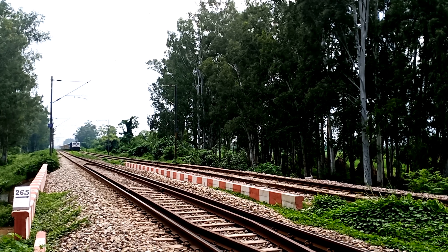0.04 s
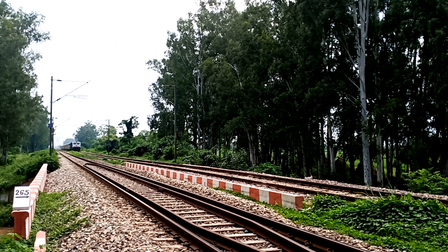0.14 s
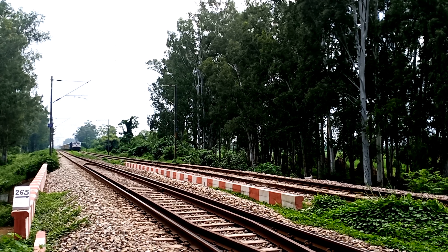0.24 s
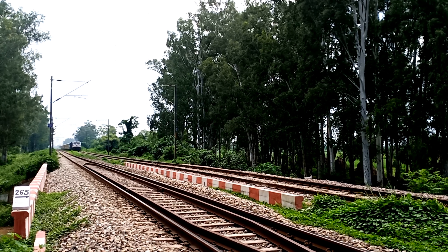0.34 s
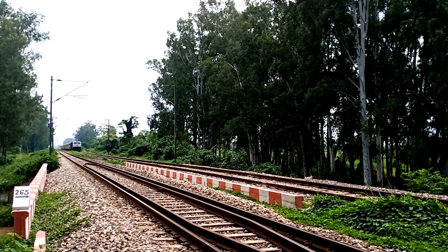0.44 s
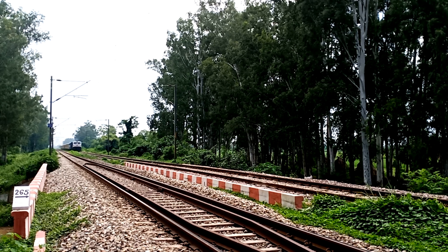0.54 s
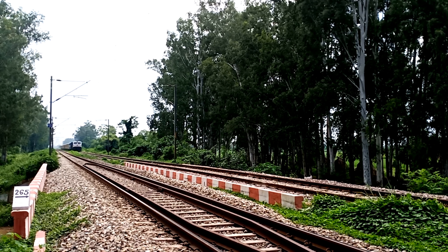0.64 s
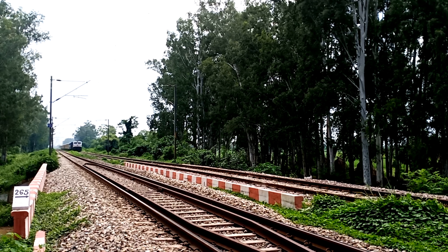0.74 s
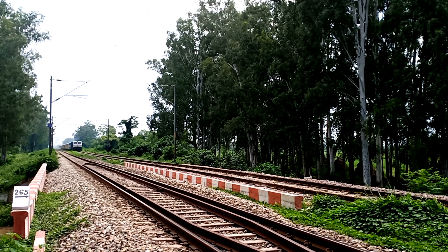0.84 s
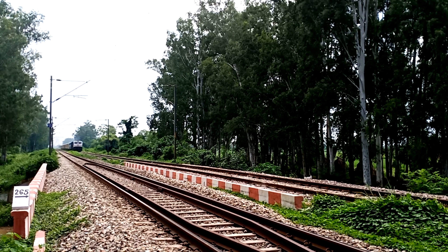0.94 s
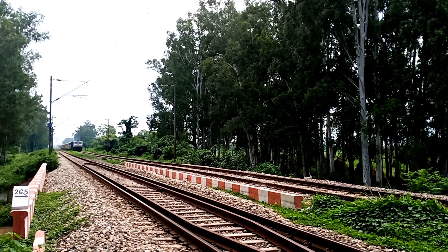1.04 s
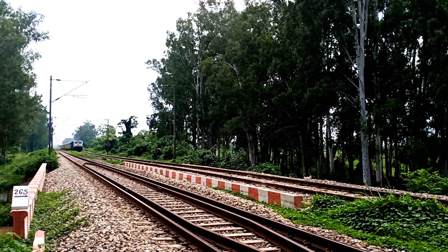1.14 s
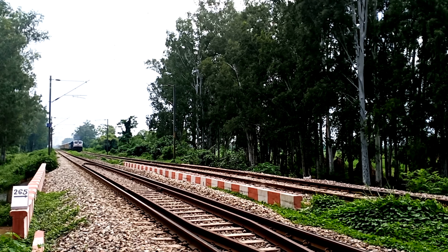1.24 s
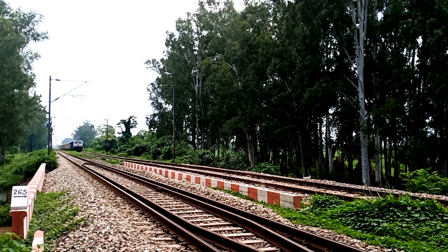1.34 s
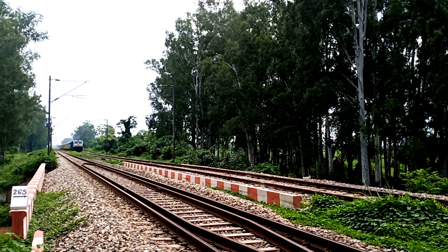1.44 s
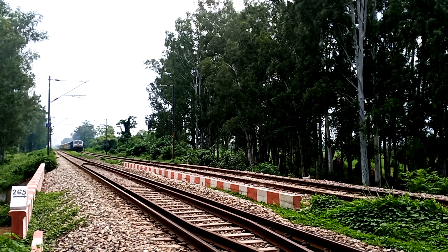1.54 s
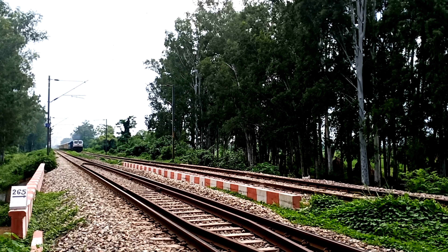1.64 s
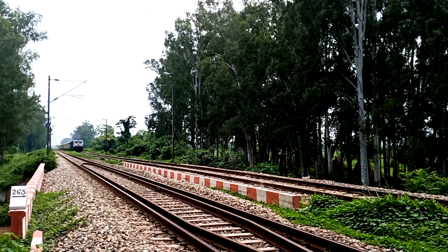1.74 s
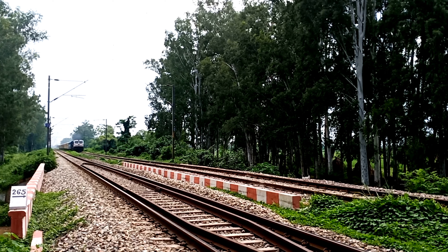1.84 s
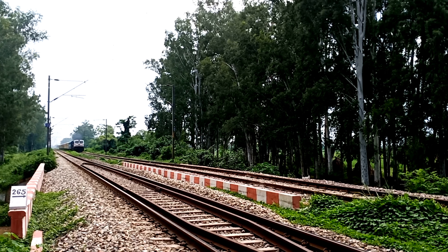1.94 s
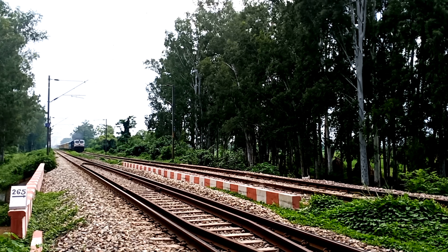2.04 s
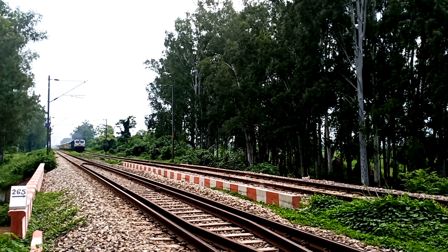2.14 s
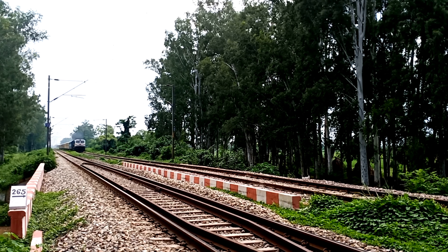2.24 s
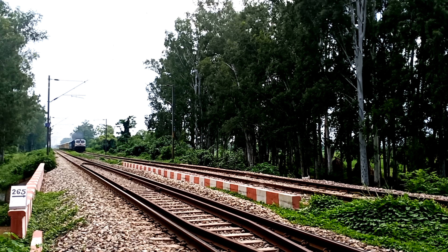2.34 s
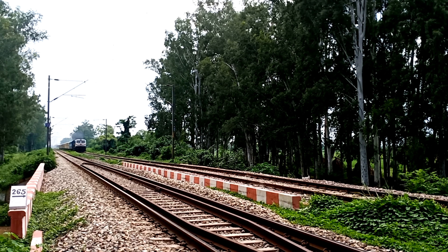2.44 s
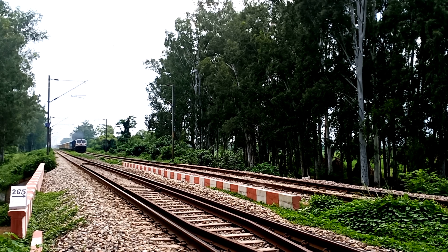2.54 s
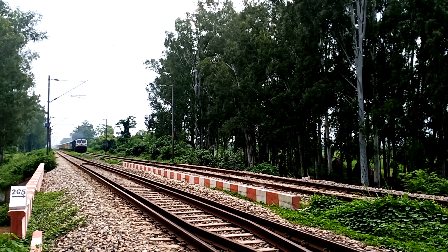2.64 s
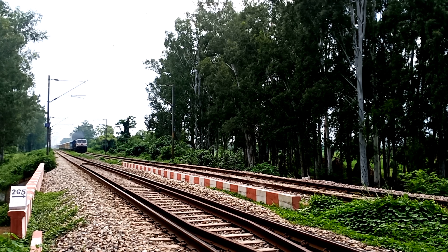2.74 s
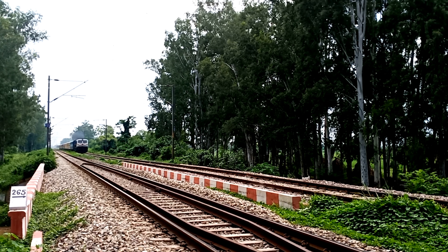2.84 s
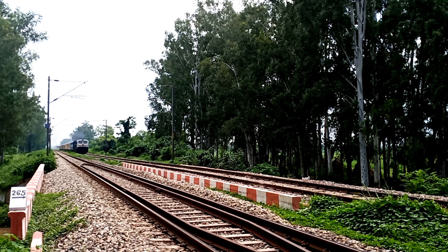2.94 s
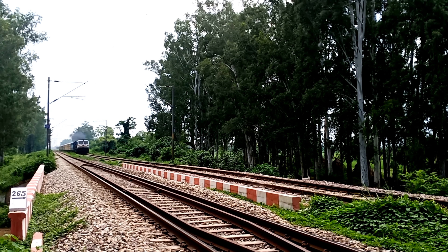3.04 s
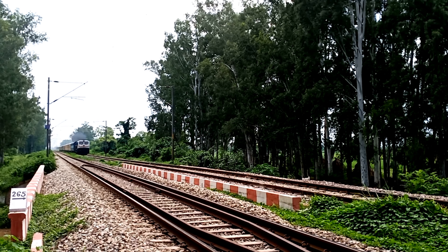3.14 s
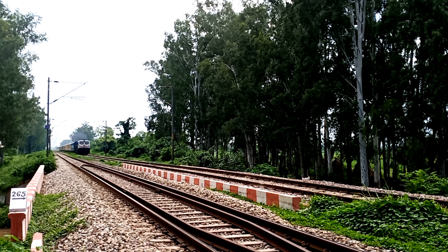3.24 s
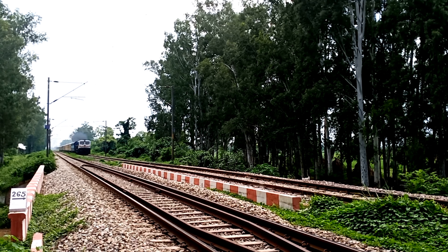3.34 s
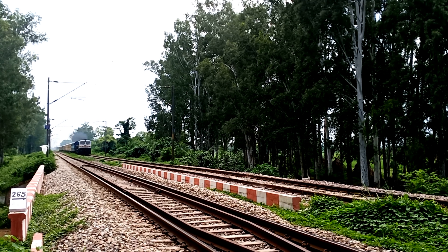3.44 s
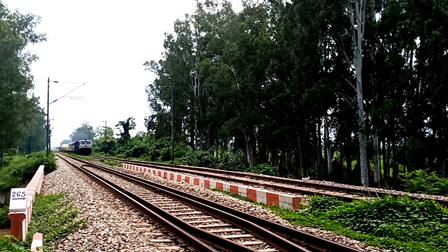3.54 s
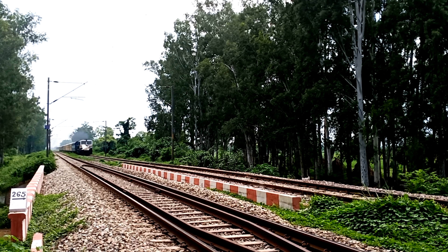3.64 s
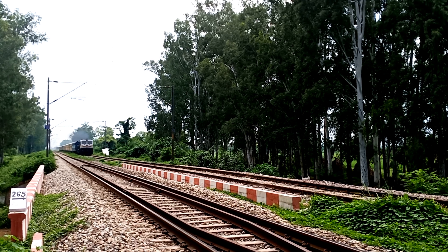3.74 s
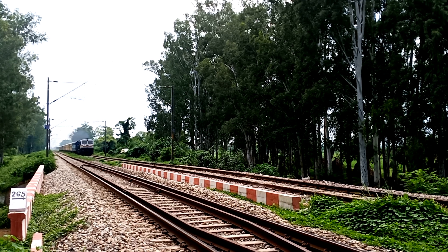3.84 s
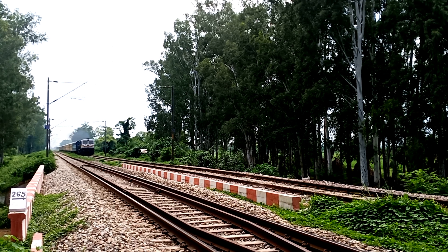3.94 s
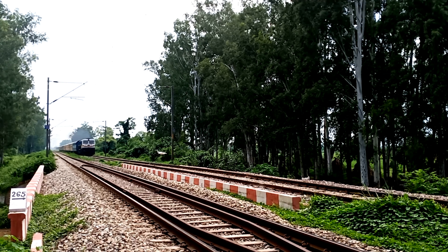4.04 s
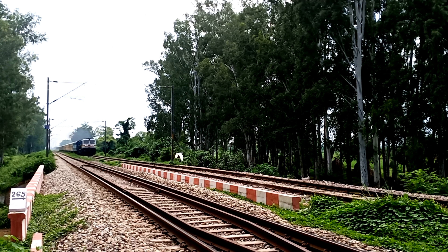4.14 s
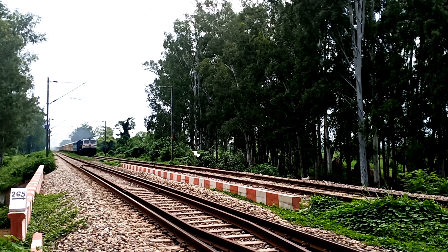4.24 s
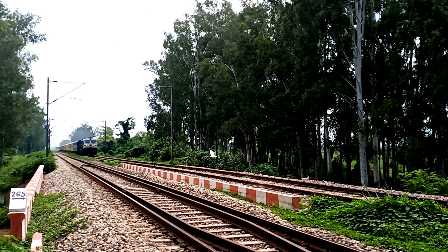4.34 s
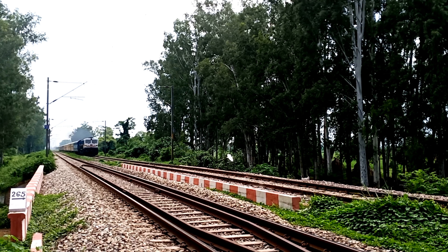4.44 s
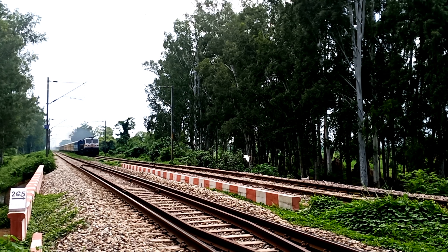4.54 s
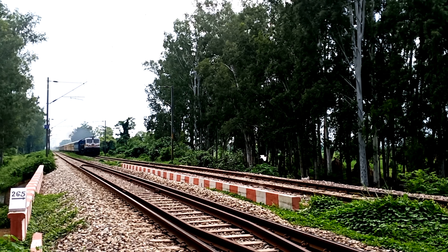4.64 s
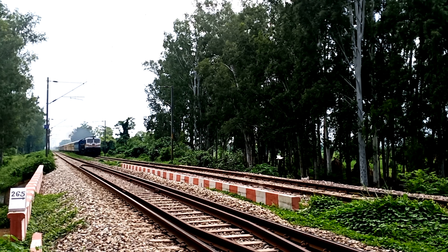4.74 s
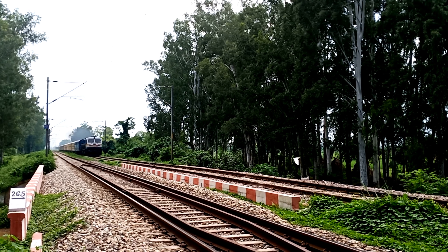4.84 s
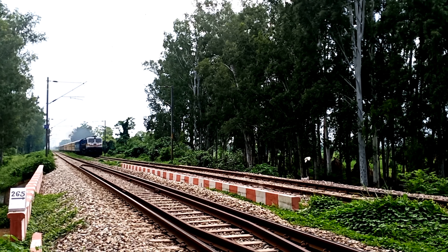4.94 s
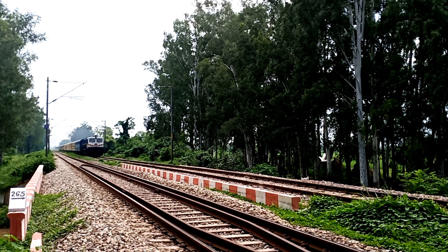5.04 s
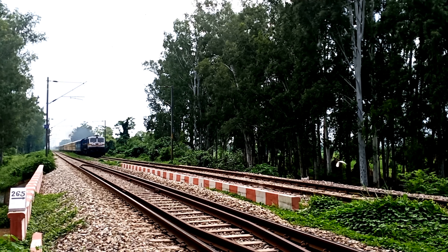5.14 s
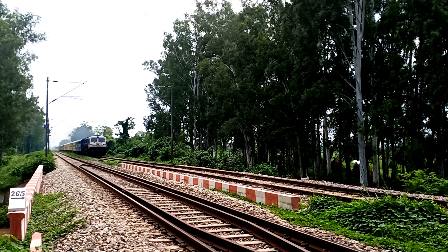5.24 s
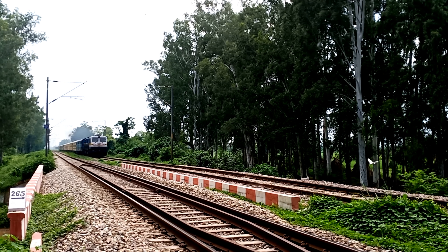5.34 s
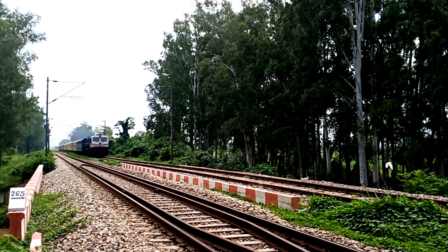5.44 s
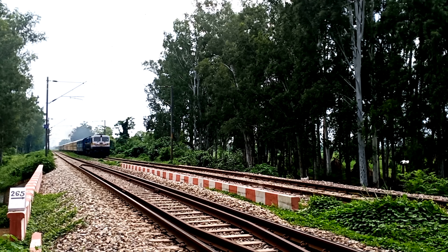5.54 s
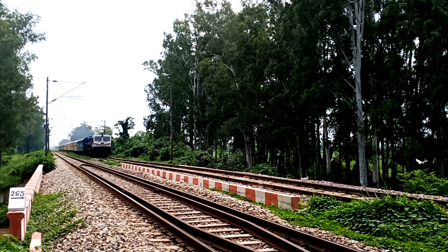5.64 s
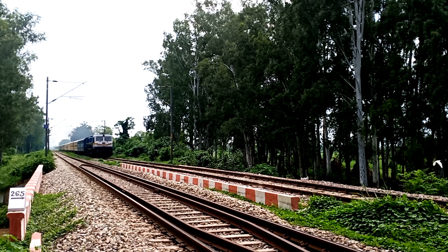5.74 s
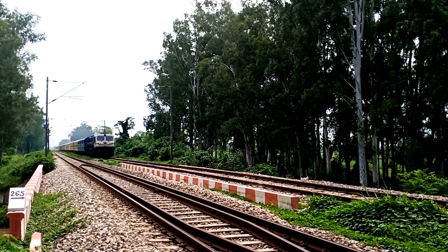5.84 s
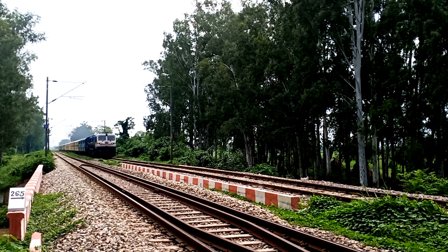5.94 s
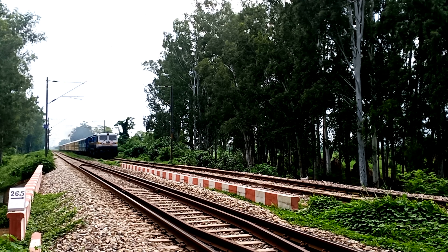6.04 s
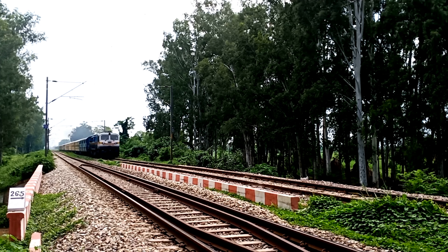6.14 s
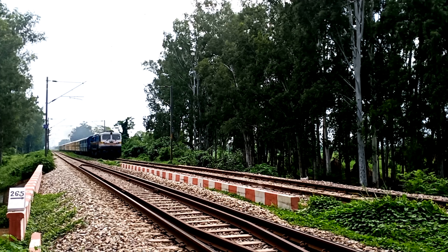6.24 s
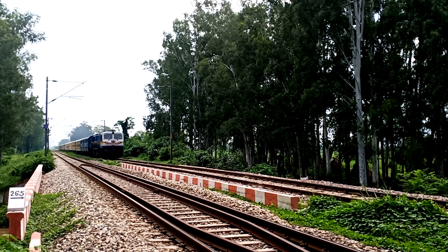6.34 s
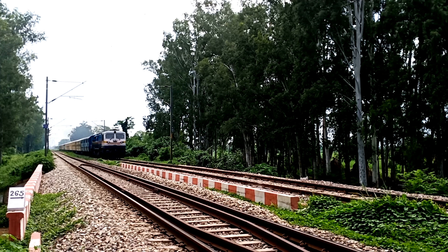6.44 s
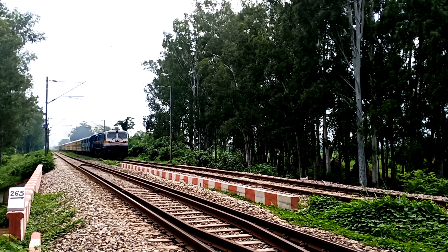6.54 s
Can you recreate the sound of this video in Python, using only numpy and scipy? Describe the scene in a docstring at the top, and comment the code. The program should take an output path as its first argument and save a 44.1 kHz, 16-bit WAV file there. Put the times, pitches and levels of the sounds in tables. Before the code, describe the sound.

A diesel train approaches through trees: faint toots over insect buzz, a high wavering metallic squeal, then growing throbbing exhaust, howl and rolling hiss.

```python
"""A track between tall trees, heard by two small microphones beside the line, as a diesel train comes up it.
Insects shrill in narrow noise bands, and thin far-off toots, glided sines, linger in scatter from the trunks.
The exhaust throbs once per crank turn, as harmonics of the crank speed beat over a noisy rumble and growl.
The roar of the wheels, shaped noise, swells and brightens; gears and rails ring in resonant bands and whines.
For a while flanges squeal: wavering harmonic tones, one set per wheel, that beat and flutter."""
import sys
import numpy as np
from scipy import signal
from scipy.fft import rfft, irfft
from scipy.io import wavfile
from scipy.ndimage import uniform_filter1d

SR = 44100
rng = np.random.default_rng(int(sys.argv[2]) if len(sys.argv) > 2 else 0)


def digitize_waveform(pressure):
    """Quantize a signal to 16-bit integers and store it at the path in sys.argv[1].

    Rows of a 2-D input are taken as channels; values are limited to [-1, 1].
    """
    field = np.atleast_2d(pressure).T
    bounded = np.clip(field, -1, 1)
    quanta = np.round(bounded * 32767).astype(np.int16)
    wavfile.write(sys.argv[1], SR, quanta)


N = 291060

FRAME, HOP = 2048, 512  # short-time spectra [samples]
TIME = np.arange(N) / SR
FRAME_TIME = np.arange(N // HOP + 5) * HOP / SR
BIN_HZ = np.fft.rfftfreq(FRAME, 1 / SR)

# approach of the rolling wheels, which also sets the rumble and the colours: (time [s], level [dB])
ROLLING_LEVEL = [(0.06, -67.5), (2.32, -53), (2.45, -48), (3.93, -41.5), (6.55, -34)]
# hoarse growl of the exhaust, 285-480 Hz: (time [s], level [dB])
GROWL_LEVEL = [(0.06, -70), (1.75, -70), (2.67, -63), (2.76, -44.5), (3.24, -56), (3.27, -44.5),
               (6.4, -36.5)]
# howl of gears and rails, 700-1050 Hz, before the trim of each layer: (time [s], level [dB])
HOWL_LEVEL = [(0.06, -57.5), (0.38, -48.5), (1.04, -58), (1.07, -52.5), (2.08, -52), (2.57, -40),
              (6.31, -29), (6.55, -32.5)]
CLOSE_DB = -36.5  # level of the wheels close by


def gain_of(db):
    """Amplitude ratio from decibels, twenty to a factor of ten."""
    return 10 ** (np.asarray(db) / 20)


def evened(x):
    """Normalization to unit root mean square."""
    return x / np.sqrt(np.mean(x ** 2) + 1e-20)


def at(rows, t):
    """Linear interpolation in time: the columns of a curve at the times t."""
    s, *columns = np.transpose(rows)
    return np.array([np.interp(t, s, c) for c in columns])


def shape(rows):
    """Spectral interpolation on a log-frequency axis: the columns at every bin."""
    hz, *columns = np.transpose(rows)
    return np.array([np.interp(np.log(BIN_HZ + 1), np.log(hz), c) for c in columns])


def level(rows):
    """Sampled envelope: a level curve [dB], one row per frame."""
    return at(rows, FRAME_TIME).T


def peak(hz, width):
    """Resonance: an amplitude response with steep skirts."""
    return 1 / (1 + 2 * ((BIN_HZ - hz) / width) ** 2)


def wander(rate):
    """Low-pass random process of rms 1: chance that changes up to about rate [Hz]."""
    t = TIME[::64]
    hz = np.fft.rfftfreq(len(t), t[1])
    spectrum = rfft(rng.standard_normal(len(t))) / (1 + (hz / rate) ** 4)
    return np.interp(TIME, t, evened(irfft(spectrum, len(t))))


def patches(size):
    """Random field of rms 1 over time and frequency, correlated over size = (frames, bins)."""
    field = rng.standard_normal((len(FRAME_TIME), len(BIN_HZ)))
    smooth_in_time = uniform_filter1d(field, size[0], axis=0)
    return evened(uniform_filter1d(smooth_in_time, size[1], axis=1))


def noise(density):
    """Partial coherence: noise of given amplitude per root Hz, shared in part by the two microphones."""
    # microphone pair: (frequency [Hz], coherence, phase by which left leads [rad])
    microphone_pair = [(170, .99, 0), (380, .92, -.3), (560, .72, -.5), (800, .76, -.4), (980, .45, 0),
                       (1100, .1, -1.5), (1420, .55, -2.6), (1900, .35, -2.4), (2250, .5, -.1),
                       (2700, .2, 1.5), (4000, .12, 2.6), (7000, .03, 0)]
    a, b, c, d = rng.standard_normal((4, len(FRAME_TIME), len(BIN_HZ)))
    coherence, lead = shape(microphone_pair)
    coherence = np.clip(coherence, -1, 1)
    left, unshared = a + 1j * b, c + 1j * d
    right = (coherence * left + np.sqrt(1 - coherence ** 2) * unshared) * np.exp(-1j * lead)
    spectra = np.array([left, right]) * density * np.sqrt(1.5 * SR / FRAME)  # 1.5 allows for window overlap
    _, pair = signal.istft(spectra.swapaxes(-1, -2), nperseg=FRAME, noverlap=FRAME - HOP)
    return pair[:, :N]


def trees(x, t60, wet_db):
    """Multiple scattering: direct sound plus sparse decaying echoes from trunks, unlike at each microphone."""
    t = TIME[:SR]
    sparse = rng.standard_normal((2, SR)) * (rng.random((2, SR)) < .05)
    tail = sparse * gain_of(-60 * t / t60)
    tail *= gain_of(wet_db) / np.linalg.norm(tail, axis=1, keepdims=True)
    scattered = signal.fftconvolve(x[None], tail, axes=1)[:, :N]
    return (x + scattered) / np.hypot(1, gain_of(wet_db))


def fading_tone(turns, rough, rate):
    """Multipath fading: a tone of rms 1 shaken in strength and phase by turbulent air and ground paths."""
    fading = (1 + rough * (wander(rate) + 1j * wander(rate))) / np.sqrt(1 + 2 * rough ** 2)
    return np.sqrt(2) * (fading * np.exp(2j * np.pi * turns)).real


def nearness():
    """Loudness as distance cue: 0 while the train is far, 1 when its wheels reach the close level."""
    approach_db = 22  # how much fainter the wheels are from afar
    return np.clip(1 + (level(ROLLING_LEVEL) - CLOSE_DB) / approach_db, 0, 1.1)


def rumble_curve():
    """Low-frequency propagation: rumble carries far, so its level grows more slowly than the wheel hiss."""
    close_rumble_db, slope, lowest_db = -34, 0.69, -50  # slope: dB gained per dB of the wheels
    return [(s, max(close_rumble_db + slope * (db - CLOSE_DB), lowest_db)) for s, db in ROLLING_LEVEL]


def insects(edge_s=0.027):
    """Narrow-band stridulation: shrill noise bands, some steady and some in short bursts."""
    # (start [s], end [s], centre [Hz], width [Hz], left density [dB per Hz], right density [dB per Hz])
    insect_bands = [(0, 5.9, 4640, 890, -84, -101), (0, 6.6, 5340, 260, -79.5, -86),
                    (0, 6.6, 9370, 686, -106, -94), (0, 0.39, 3730, 130, -78, -93),
                    (.2, 0.42, 7020, 330, -85, -89), (1.18, 1.66, 7060, 330, -91, -93),
                    (1.42, 1.93, 11330, 415, -106, -93.5), (1.739, 2.2, 7120, 326, -88, -89.5)]
    power = 0
    for start, end, hz, width, left_db, right_db in insect_bands:
        inside = np.minimum(FRAME_TIME - start, end - FRAME_TIME)
        gate = np.clip(inside / edge_s + .5, 0, 1)[:, None]
        band = np.exp(-2 * ((BIN_HZ - hz) / width) ** 2)
        power = power + (gain_of([[[left_db]], [[right_db]]]) * gate * band) ** 2
    return noise(np.sqrt(power))


def exhaust(throb_trim_db=-3.5, rough=.2, side_rough=0.5, first_throb_turns=.52, pipe_lag_turns=0.11):
    """Harmonic beating: eight firings a turn boom; lines from uneven cylinders beat with it once a turn."""
    # crankshaft: (time [s], speed [turns per s])
    crank = [(0.0, 16.85), (0.8, 16.83), (2.1, 16.55), (2.7, 16.54), (3.6, 16.93), (4.3, 17.13),
             (5.4, 16.79), (6.6, 16.83)]
    # (time [s], boom level at the firing rate [dB], level of the uneven throb before its trim [dB])
    exhaust_levels = [(0.06, -59, -56), (0.11, -52, -51.5), (0.49, -64, -44.5), (0.84, -50.5, -63),
                      (1.16, -37.5, -46), (1.69, -43.5, -45), (2.01, -73.5, -71), (2.41, -29.5, -37.5),
                      (2.84, -44, -45.5), (3.17, -37.5, -41), (3.33, -31, -34.5), (4.14, -25, -30.5),
                      (4.58, -46, -36), (4.85, -26.5, -30.5), (5.54, -25, -28), (5.75, -29, -40),
                      (6.04, -27, -29.5), (6.13, -34, -27.5), (6.3, -20, -27), (6.55, -24.5, -29)]
    # lines beating with the boom: (multiple of crank speed, level against the throb [dB])
    throb_lines = [(7, -12.5), (9, 1.5), (10, -1.5), (11, -16.5)]
    # drone just above the boom: (time [s], level [dB])
    drone_level = [(0.08, -68.5), (3.27, -56), (3.66, -38), (4.75, -63.5), (5.09, -36.5), (5.36, -48),
                   (5.57, -36), (5.77, -43.5), (6.55, -33)]
    # lines of three layers: (multiple of crank speed, level against the layer's curve [dB])
    rumble_lines = [(2, -44), (3, -27), (4, -9.5), (5, -11), (6, -14.5)]
    drone_lines = [(12, -11), (13, -3), (14, -14.5), (15, -9.5), (16, -9.5)]
    growl_lines = [(18, -6.5), (20, -24), (22, -12.5), (24, -13.5), (25, -11)]
    firing_order = 8  # firings per turn
    turns = np.cumsum(at(crank, TIME)[0]) / SR - first_throb_turns
    boom_db, throb_db = at(exhaust_levels, TIME)
    out = gain_of(boom_db) * fading_tone(firing_order * turns, rough / 2, rate=5.1)
    for order, db in throb_lines:  # in step with the boom, so that the beat is firm
        lag = pipe_lag_turns * (order - firing_order) ** 2  # the pipe spreads each throb out in time
        out += gain_of(throb_db + throb_trim_db + db) * fading_tone(order * turns + lag, rough, rate=4.8)
    layers = [(rumble_lines, rumble_curve()), (drone_lines, drone_level), (growl_lines, GROWL_LEVEL)]
    for lines, curve in layers:
        layer_db = at(curve, TIME)[0]
        for order, db in lines:  # these come at any phase and fade more
            out += gain_of(layer_db + db) * fading_tone(order * turns + rng.random(), side_rough, rate=1.9)
    return out * gain_of([[.8], [-.8]])


def engine_noise(rumble_trim_db=-1, growl_patchy_db=3.0, rumble_patchy_db=2.5):
    """Turbulent flow noise: low rumble and the hoarse rush of exhaust gas, in uneven patches."""
    # spectra: (frequency [Hz], density against the layer's level [dB per Hz])
    rumble_shape = [(10, -59), (25, -52), (42, -40), (65, -30.5), (110, -20.5), (170, -26.5), (230, -42.5),
                    (400, -57), (900, -75.5)]
    growl_shape = [(100, -50), (220, -30.5), (310, -22.5), (420, -27), (520, -30), (640, -42.5),
                   (1000, -36.5), (2500, -83)]
    rumble_db = rumble_trim_db + level(rumble_curve()) + shape(rumble_shape)
    rumble = gain_of(rumble_db + rumble_patchy_db * patches(size=(20, 12)))
    growl_db = level(GROWL_LEVEL) + shape(growl_shape)
    growl = gain_of(growl_db + growl_patchy_db * patches(size=(4, 6)))
    return noise(np.hypot(rumble, growl) * gain_of([[[1]], [[-1]]]))


def rolling(patchy_db=1.0, far_patchy_db=2.0, flicker_db=0.43):
    """Distance-dependent colour: broad wheel hiss, uneven from afar, whose treble comes through when near."""
    # rolling noise from far and near: (frequency [Hz], left density [dB per Hz], right density [dB per Hz])
    far_colour = [(288, -35, -33), (550, -53, -55), (1170, -32, -33), (1810, -23, -33), (2340, -27.5, -31),
                  (2800, -27.5, -42), (3450, -23, -37), (4580, -20.5, -46), (4940, -31.5, -29),
                  (5970, -26.5, -42), (7210, -40.5, -54.5), (9140, -83, -44), (11400, -87, -88),
                  (15600, -61, -83)]
    near_colour = [(560, -32, -54), (1110, -28, -27), (1490, -23.5, -27.5), (2390, -26.5, -26.5),
                   (2750, -26.5, -29), (3700, -25, -32.5), (4170, -23, -32.5), (6140, -29.5, -38),
                   (7000, -35, -38), (8670, -45.5, -40.5), (9900, -61, -38.5), (9950, -49.5, -56),
                   (13670, -53.5, -57), (15100, -32.5, -43)]
    near = nearness()
    colour_db = (1 - near) * shape(far_colour)[:, None] + near * shape(near_colour)[:, None]
    gusts_db = (patchy_db + far_patchy_db * (1 - near)) * patches(size=(7, 10))
    gusts_db += flicker_db * patches(size=(4, 400))
    return noise(gain_of(level(ROLLING_LEVEL) + colour_db + gusts_db))


def howl(trim_db=-0.82, patchy_db=1.68, far_patchy_db=2.34):
    """Resonance under random excitation: gears and rails ring in a few bands."""
    # (frequency [Hz], width [Hz], level when far [dB], level when near [dB], left-right difference [dB])
    rings = [(713, 124, -38.5, -26.5, 1.5), (787.6, 62, -24, -22.5, 1), (935, 93, -26.5, -29.5, 11.5),
             (1009, 91, -33.5, -26.5, -1.5), (1428, 53, -20, -34, 7), (2247, 210, -44, -35, 13.5)]
    near, side = nearness(), np.array([.5, -.5])[:, None, None]
    power = 0
    for hz, width, far_db, near_db, pan_db in rings:
        ring_db = (1 - near) * far_db + near * near_db + side * pan_db
        power = power + (gain_of(ring_db) * peak(hz, width)) ** 2
    gusts_db = (patchy_db + far_patchy_db * (1 - near)) * patches(size=(9, 6))  # a long path wavers more
    return noise(np.sqrt(power) * gain_of(trim_db + level(HOWL_LEVEL) + gusts_db))


def whines(rough=0.2, drift_hz=2.5):
    """Independent fading: narrow tones of the running gear waver differently at each microphone."""
    # (frequency [Hz], level when far [dB], level when near [dB], left-right difference [dB])
    whine_tones = [(786, -8.5, -12.5, 12), (990, -21, -8, -12.5), (1410, -10.5, -24, -8.5)]
    near = np.interp(TIME, FRAME_TIME, nearness()[:, 0]) ** 2
    howl_db, side = at(HOWL_LEVEL, TIME)[0], np.array([[.5], [-.5]])
    out = np.zeros((2, N))
    for hz, far_db, near_db, pan_db in whine_tones:
        turns = np.cumsum(hz + drift_hz * wander(1.93)) / SR
        pair = np.array([fading_tone(turns, rough, rate=1.8), fading_tone(turns, rough, rate=10.6)])
        out += pair * gain_of(howl_db + (1 - near) * far_db + near * near_db + side * pan_db)
    return out


def toots(trim_db=2, jitter_hz=40):
    """Frequency modulation and reverberation: thin, hoarse tones blur and linger between the trees."""
    # far toots and calls, a row per partial, levels before the trim:
    # (start [s], length [s], frequency [Hz], glide [Hz per s], level [dB])
    toot_partials = [(0.414, 0.12, 2520, -400, -52.5), (0.422, 0.19, 2870, 7.5, -62),
                     (0.438, 0.18, 3228, 3, -50), (0.637, 0.072, 2500, -400, -52.5),
                     (0.674, .1, 2850, 700, -53), (0.661, 0.14, 3200, 0, -48.5),
                     (0.671, 0.087, 3386, 802, -48.5), (1.107, 0.067, 3400, -1, -52.5),
                     (1.96, 0.25, 3385, 1, -52.5)]
    out = np.zeros(N)
    for start, length, hz, glide, db in toot_partials:
        age = TIME - start
        gate = np.clip(np.minimum(age, length - age) / 0.011, 0, 1)
        turns = np.cumsum(hz + glide * age + jitter_hz * wander(70)) / SR
        out += gain_of(db + trim_db) * gate * np.sqrt(2) * np.sin(2 * np.pi * turns)
    return trees(out, t60=1.34, wet_db=6)


def squeal(attack_s=0.12, release_s=0.44, grip_s=0.015, jitter_hz=15, flutter_db=2.5):
    """Stick-slip: flanges grip and slide on the rail; wavering tones beat, and trees smear them to a flutter."""
    # one row per wheel: (start [s], length [s], starting pitch [Hz], glide [Hz per s], level [dB])
    squealing_wheels = [(2.025, 1.12, 5047, 55, -30.5), (2.15, 1.236, 5091, 62.5, -33.5),
                        (2.379, 1.12, 5226, -18.5, -34)]
    # harmonics of each wheel: (multiple of its pitch, left level [dB], right level [dB])
    squeal_partials = [(1, 1.5, -2), (2, -20, -18), (3, -20, -35)]
    # moments of flange grip: (time [s], extra level [dB], where 0 leaves the squeal unchanged)
    flange_grips = [(2.305, 6.5), (2.55, 7), (2.83, 0), (3.037, 7.5)]
    out = np.zeros((2, N))
    for start, length, hz, glide, db in squealing_wheels:
        age = TIME - start
        gate = np.clip(age / attack_s, 0, 1) ** 2 * np.clip((length - age) / release_s, 0, 1)
        turns = np.cumsum(hz + glide * age + jitter_hz * wander(44.7)) / SR
        for multiple, left_db, right_db in squeal_partials:
            tone = np.sqrt(2) * gain_of(db) * gate * np.sin(2 * np.pi * multiple * turns)
            out += gain_of([[left_db], [right_db]]) * trees(tone, t60=0.15, wet_db=6.0)
    grips_db = sum(db * np.exp(-((TIME - s) / grip_s) ** 2) for s, db in flange_grips)
    flutter = evened(gain_of(flutter_db * wander(33)))  # the grip comes and goes
    return gain_of(grips_db) * flutter * out


def scene():
    """Superposition: the train and the wood around it."""
    wood = insects() + toots()
    engine = exhaust() + engine_noise()
    running_gear = rolling() + howl() + whines() + squeal()
    return wood + engine + running_gear


def record(dry):
    """Band limitation: the recorder's steep low-pass filter."""
    edge_hz = 15950
    low_pass = signal.firwin(1023, edge_hz, window=("kaiser", 9), fs=SR)
    return signal.oaconvolve(dry, low_pass[None], "same")


dry = scene()
out = record(dry)
digitize_waveform(out)
```